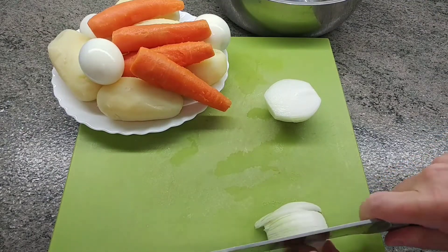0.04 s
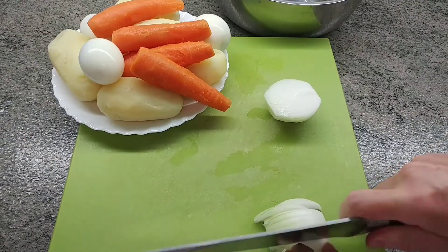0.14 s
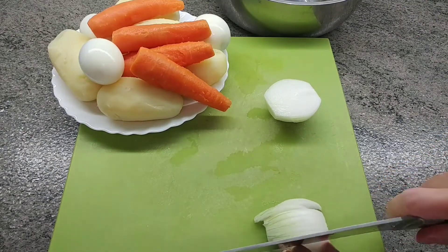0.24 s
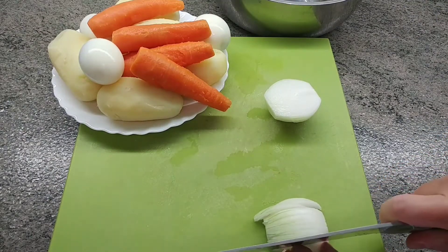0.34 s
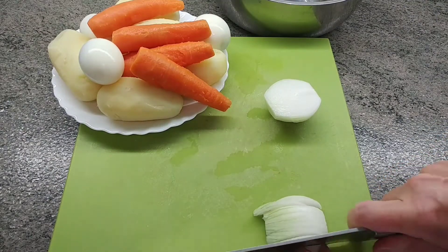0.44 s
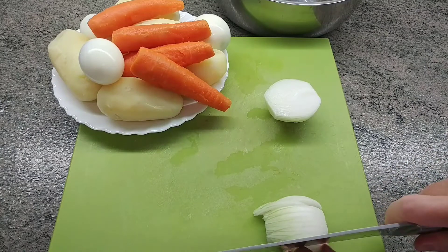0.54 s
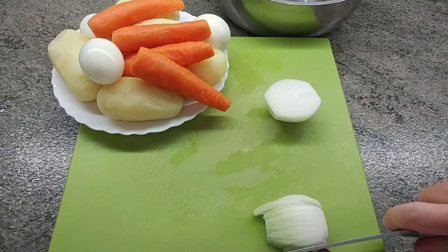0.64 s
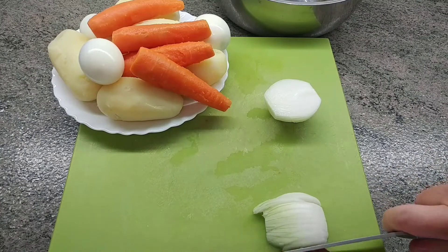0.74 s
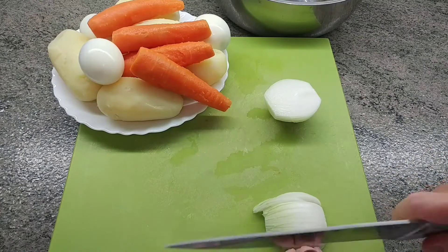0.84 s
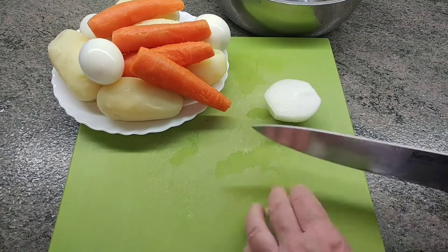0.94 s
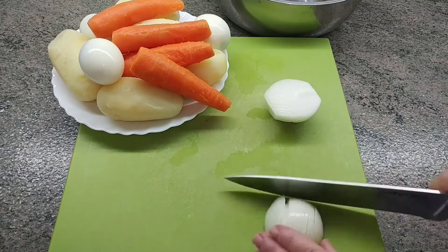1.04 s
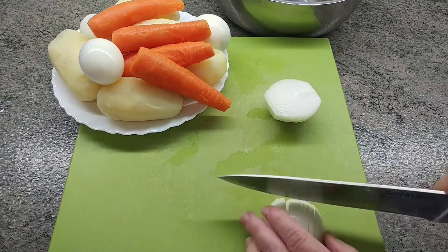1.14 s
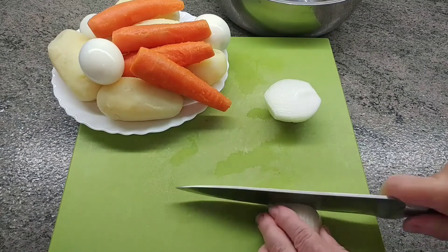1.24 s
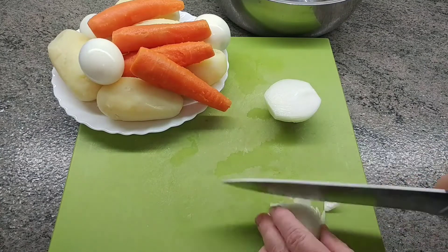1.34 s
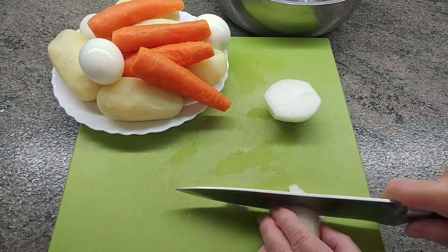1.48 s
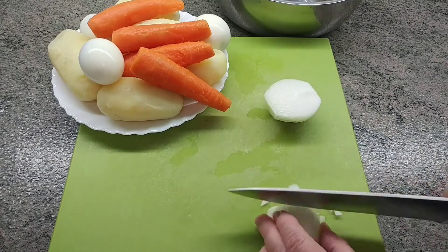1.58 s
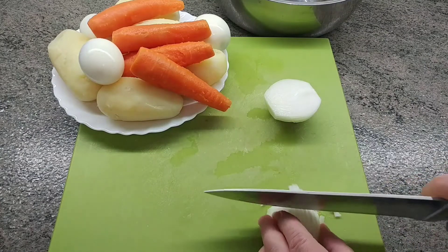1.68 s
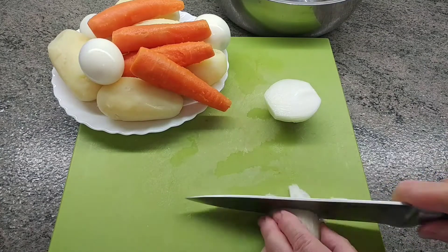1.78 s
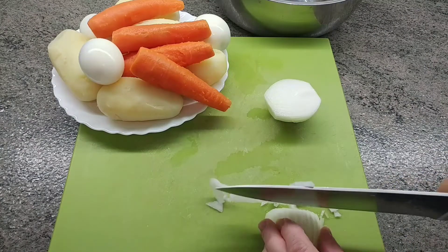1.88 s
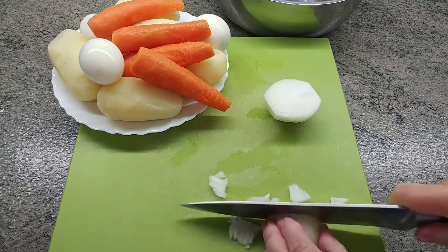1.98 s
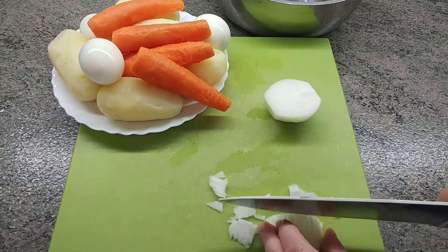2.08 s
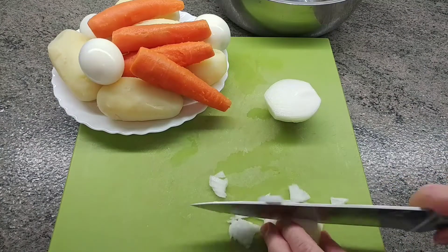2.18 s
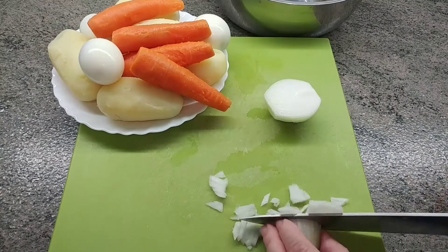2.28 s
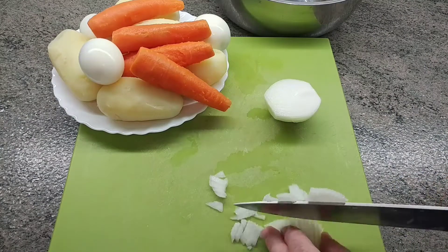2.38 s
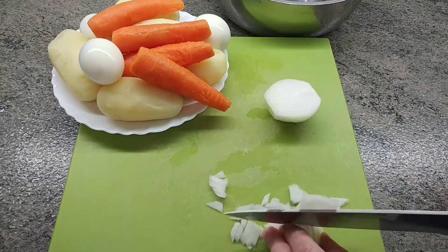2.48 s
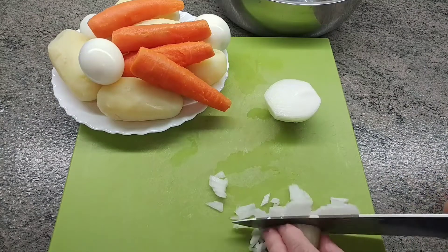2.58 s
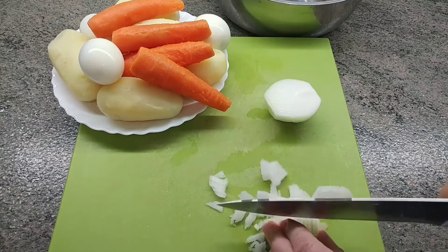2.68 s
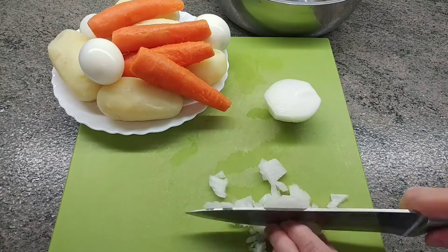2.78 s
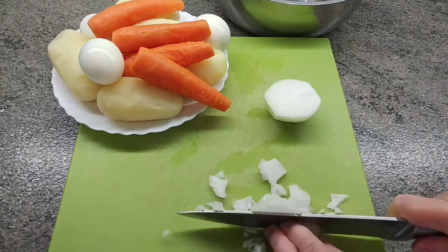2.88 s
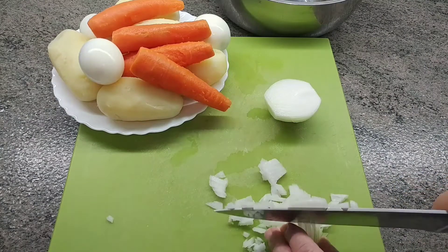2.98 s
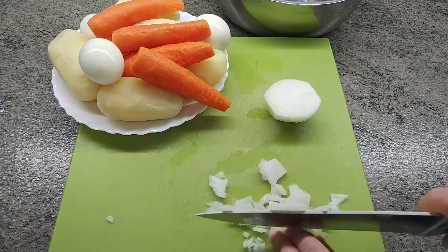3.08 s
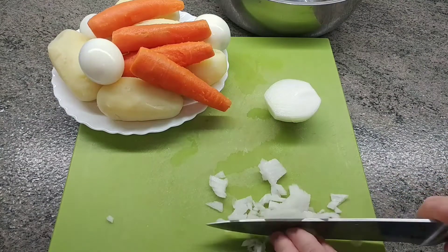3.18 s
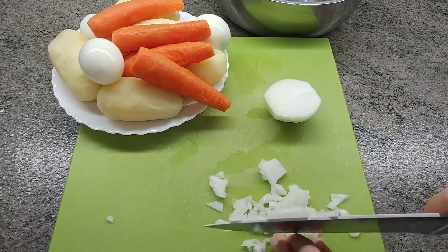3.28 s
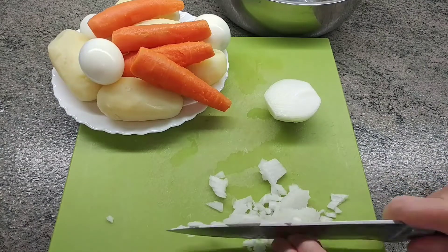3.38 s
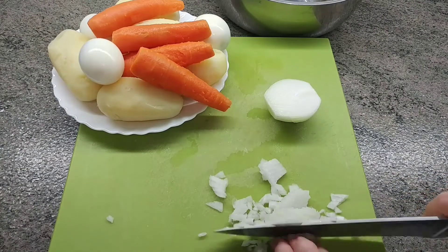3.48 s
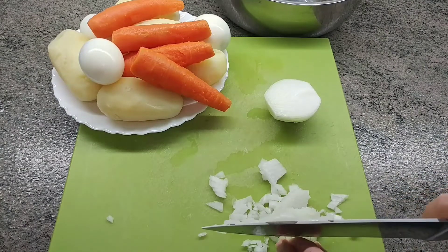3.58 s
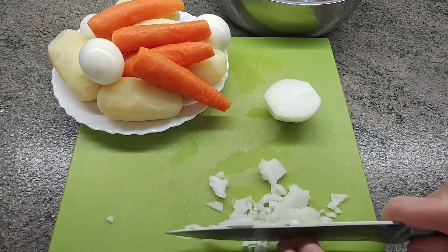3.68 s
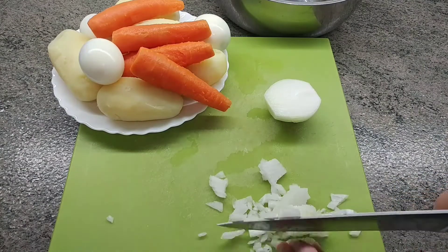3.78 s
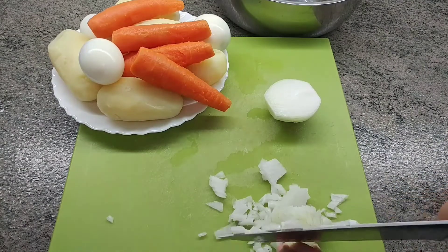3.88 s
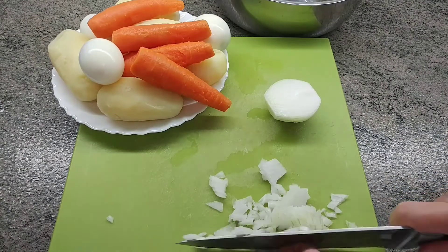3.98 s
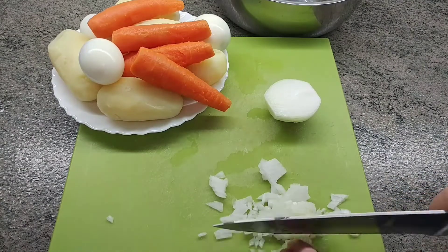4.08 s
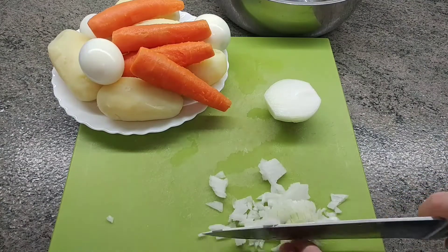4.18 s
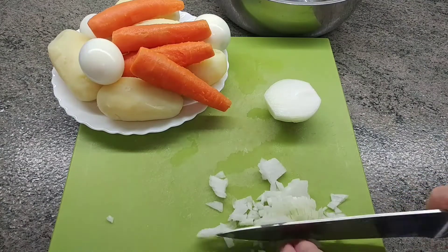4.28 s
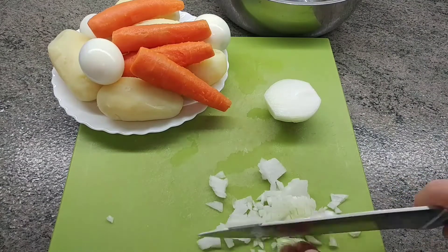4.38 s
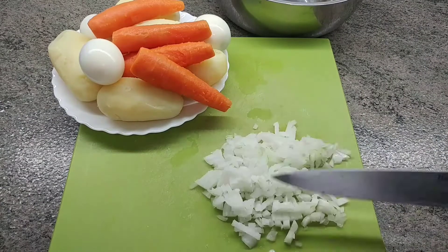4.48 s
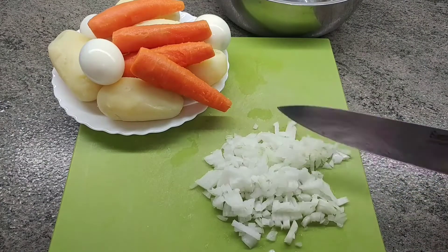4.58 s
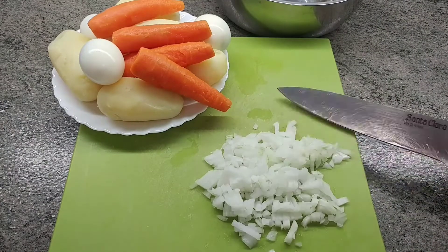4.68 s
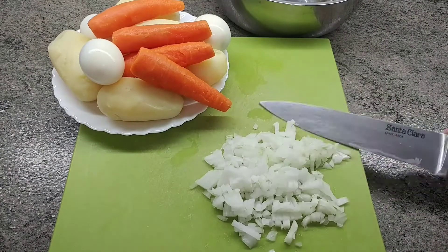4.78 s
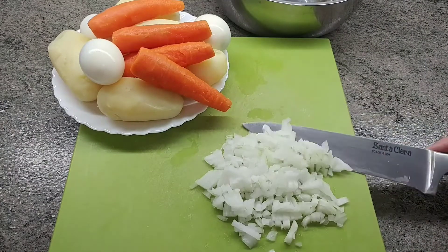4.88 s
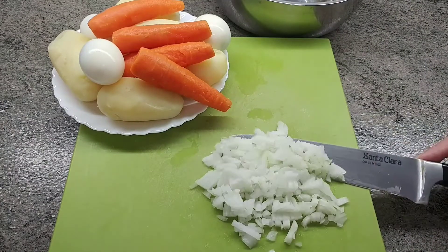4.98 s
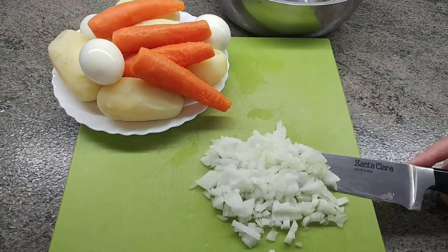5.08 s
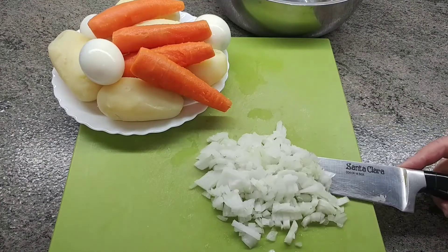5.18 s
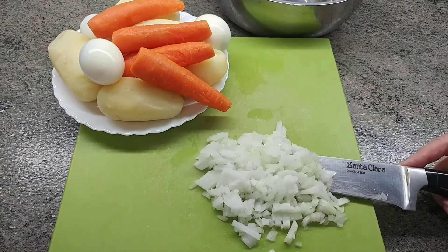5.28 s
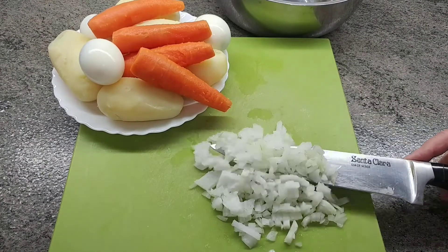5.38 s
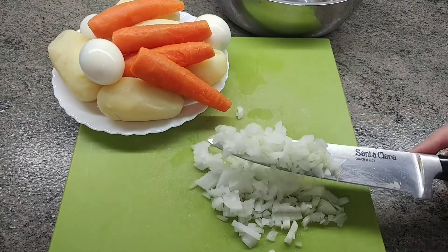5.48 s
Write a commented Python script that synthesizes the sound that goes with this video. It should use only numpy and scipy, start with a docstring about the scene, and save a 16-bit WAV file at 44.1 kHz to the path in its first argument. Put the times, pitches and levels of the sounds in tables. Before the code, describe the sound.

A large knife crunches through an onion with knocking strokes on a plastic board, then a short click and a steady low appliance hum.

```python
"""A chef's knife slices and dices an onion on a plastic board on a kitchen counter, heard from close by.
Each stroke is a crowd of tiny clicks for the crunch, ringing board modes as the edge rolls on,
and low bumps for the counter; small birds chirp outside as gliding tones with echoes.
Towards the end comes a short click with a low thump, and an appliance hums as shaped noise while the knife
is set down and slid under the pieces; the blade sings now and then, and faint room noise lies under it all."""
import sys
import numpy as np
from scipy import signal
from scipy.fft import rfft, irfft
from scipy.io import wavfile

SR = 44100
rng = np.random.default_rng(int(sys.argv[2]) if len(sys.argv) > 2 else 0)


def output_pcm(signal):
    """Save a mono or channel-first signal as 16-bit PCM at the path in sys.argv[1].

    Samples are clipped to [-1, 1] before scaling.
    """
    pcm = np.clip(np.atleast_2d(signal).T, -1, 1) * 32767
    wavfile.write(sys.argv[1], SR, np.round(pcm).astype(np.int16))


N = 244065   # length in samples

# The knife strokes; all levels are relative, and each sound adds its own trim.
# Each row: edge is in at (s), rise before that (s), edge lands at (s), fall by 60 dB after landing (s),
# crunch going in (dB), crunch coming through (dB), juicy fizz near 7 kHz (dB),
# slackening of the rub before the edge is through (dB), rubbing in the board's low modes going in (dB)
# and landing (dB), the same two for its high modes (dB), push on the counter going in (dB) and landing (dB).
STROKES = [(0.0, .03, 0.11, .09, -66, -50.5, 5, -10.5, -49.5, -25.5, -48.5, -50.5, -50, -27),
           (.337, 0.0071, .44, 0.099, -65.5, -54, 4, -4.5, -53, -15.5, -53.5, -10, -56, -17.5),
           (.735, 0.013, 0.8, 0.076, -52.5, -53, 2.5, 8, -41, -23, -47.5, -16, -45, -33.5),
           (.96, .03, 1.078, 0.048, -79, -82, 3.6, -4, -52, -57, -46.5, -68, -66.5, -63.5),
           (1.068, 0.031, 1.089, 0.07, -65, -74, 3.9, 7, -34.5, -38.5, -58, -75, -39, -47),
           (1.274, 0.036, 1.312, 0.14, -54, -45.5, 2.6, 5, -25.5, -35, -41.5, -39, -45.5, -43),
           (1.496, 0.017, 1.58, 0.08, -52.5, -55, 3.6, 1.5, -34.5, -33, -46, -35, -43, -39),
           (1.733, 0.014, 1.826, 0.071, -55.5, -51, 2.6, -4.5, -35.5, -18.5, -40.5, -16, -50, -34),
           (1.992, .04, 2.051, 0.077, -41, -51, 3, 13.5, -28.5, -24, -28, -26, -33, -36.5),
           (2.202, .024, 2.277, .085, -54.5, -48.5, 1.86, 10.5, -28.5, -25, -29.5, -28, -38, -35.5),
           (2.512, 0.042, 2.59, 0.14, -45.5, -54, 4.2, 16, -30, -29.5, -28, -32, -44, -39),
           (2.76, 0.035, 2.794, 0.087, -42.5, -45, 3.2, 9, -23, -39, -29, -40, -35.5, -36),
           (2.849, 0.011, 2.905, 0.082, -57.5, -56, 2.5, -1, -34, -31, -34, -27, -58, -46),
           (2.93, 0.028, 2.99, 0.052, -72, -70, 3, 4, -42.5, -51.5, -42, -70, -60, -46.5),
           (3.137, 0.078, 3.178, 0.13, -46.5, -41, 1, 2, -31, -20.5, -33.5, -24, -42, -38.5),
           (3.364, .025, 3.43, 0.12, -53, -46.5, 2.7, 5, -38, -23, -40.5, -27, -43.5, -38),
           (3.676, 0.09, 3.74, 0.11, -58, -51.5, 2.6, 8.5, -36.5, -36, -38, -41.5, -46.5, -38),
           (3.966, 0.056, 4.029, 0.092, -53.5, -51.5, 2.8, -1.5, -35, -23.5, -34, -25, -45, -36),
           (4.224, 0.079, 4.27, 0.094, -49, -63, 3.9, 25, -42.5, -42, -43.5, -35, -53, -44.5)]


def from_db(db):
    """Turns a level in dB into a gain."""
    return 10 ** (np.asarray(db) / 20)


def rms_one(x):
    """Scales a sound to an rms (average strength) of 1."""
    return x / np.sqrt(np.mean(x ** 2) + 1e-20)


def in_time(rows):
    """Joins timed rows by straight lines: one curve a column, one value a sample."""
    s, *columns = np.transpose(rows)
    return [np.interp(np.arange(N) / SR, s, column) for column in columns]


def at_hz(points):
    """Reads a curve over frequency at every FFT bin, with straight lines on a log-frequency axis."""
    hz = np.maximum(np.arange(N // 2 + 1) * SR / N, 1)
    points = np.array(points)
    return np.interp(np.log(hz), np.log(points[:, 0]), points[:, 1])


def coloured(x, spectrum):
    """Filters a sound by a spectrum in dB and scales it to rms 1."""
    return rms_one(irfft(rfft(x) * from_db(at_hz(spectrum)), N))


def resonate(x, hz, width_hz):
    """Rings like one damped resonance, with a gain of about 1 at its peak."""
    r = np.exp(-np.pi * max(width_hz, 5) / SR)
    feedback = [1, -2 * r * np.cos(2 * np.pi * hz / SR), r * r]
    return signal.lfilter([(1 - r * r) / 2, 0, (r * r - 1) / 2], feedback, x + 1e-18)


def bandpass(x, low_high_hz):
    """Keeps one band of frequencies."""
    return signal.sosfilt(signal.butter(2, low_high_hz, "band", fs=SR, output="sos"), x)


def grains(per_s, spread_db):
    """Makes two draws of random clicks of uneven size, at rms 1."""
    sizes = from_db(spread_db * np.minimum(rng.exponential(1, (2, N)), 5))
    signs = rng.choice([-1, 1], (2, N))
    happens = rng.random((2, N)) < per_s / SR
    return rms_one(sizes * signs * happens)


def flicker(per_s, depth_db):
    """Makes a gain that wanders at random."""
    r = np.exp(-2 * np.pi * per_s / SR)
    wander = signal.lfilter([1], [1, -2 * r, r * r], rng.standard_normal(N))
    return from_db(depth_db * rms_one(wander))


def swell(s, rise_s, t60):
    """Makes an envelope that climbs to 1, then falls by 60 dB in t60 seconds; it ends within half a second."""
    out, i = np.zeros(N), round(s * SR)
    t = np.arange(min(N - i, SR // 2)) / SR
    climb = np.minimum(t / max(rise_s, 1e-4), 1) ** 2
    fall = from_db(-60 * np.maximum(t - rise_s, 0) / max(t60, .003))
    out[i:i + len(t)] = climb * fall
    return out


def cutting():
    """Follows crunch, low rubbing, high rubbing and push as each stroke rises, slackens, lands and dies away."""
    # The knife set down and slid under the pieces. Each row: time in seconds, crunch in dB,
    # low rubbing in dB, high rubbing in dB, push in dB.
    slide = [(4.36, -100, -84, -100, -88), (4.48, -74, -52.5, -78.5, -56), (4.506, -93, -59, -81.5, -72),
             (4.582, -78.5, -47, -89, -66), (4.61, -76.5, -58, -70, -59.5), (4.734, -89.5, -71, -79, -76.5),
             (4.76, -91, -33, -35.5, -34), (4.804, -80, -56.5, -57.5, -57.5),
             (4.926, -73.5, -54.5, -72, -48.5), (5.002, -85, -69, -66, -58), (5.1, -83, -66, -79.5, -63.5),
             (5.138, -65, -58.5, -73.5, -56), (5.172, -84.5, -70, -75, -58), (5.48, -92, -59.5, -76.5, -62),
             (5.53, -94, -51.5, -81, -62)]
    # Quietest levels, between strokes: crunch, low rubbing, high rubbing and push, each in dB.
    rest_db = (-93, -88.5, -92, -80)
    # How much of the slackening reaches low rubbing, high rubbing and push, each as a plain factor.
    sag_shares = (0.63, 1.3, .4)
    roll_s = 0.033   # longest time between the edge coming through the onion and lying on the board
    # the crunch drops while the edge rolls on, then outlasts the board by this factor
    crunch_stop_db, crunch_linger = 6.5, 1.18
    # after this share of its fall time a stroke has lost only this much, then it stops faster
    tail_knee, tail_knee_db = 0.47, 25
    t = np.arange(N) / SR
    levels = np.maximum(in_time(slide), np.array(rest_db, float)[:, None])
    for s, rise, lands, t60, crunch_in, crunch_through, _, sag_db, *contact in STROKES:
        through = max(lands - roll_s, (s + lands) / 2)
        shapes = [(crunch_in, crunch_through, crunch_through - crunch_stop_db, t60 * crunch_linger)]
        for going_in, landing, share in zip(contact[::2], contact[1::2], sag_shares):
            shapes.append((going_in, going_in - share * sag_db, landing, t60))
        span = slice(max(int((s - rise) * SR), 0), int((lands + 2 * t60) * SR))
        for level, rest, (going_in, slack, landing, dying) in zip(levels, rest_db, shapes):
            times = [s - rise, s, through, lands, lands + tail_knee * dying, lands + 2 * dying]
            heights = [rest, going_in, slack, landing, landing - tail_knee_db, landing - 130]
            level[span] = np.maximum(level[span], np.interp(t[span], times, heights))
    return levels


def crunch(crunch_db):
    """Onion cells burst as dense, clumped clicks under the edge, and each band of pitch flickers by itself."""
    # Colour of the bursting cells. Each row: frequency in Hz, relative level in dB.
    cell_colour = [(880, -32), (1500, -9), (1760, 0), (2070, -25.5), (2550, -3.5), (2940, -7.5),
                   (3890, -3.5), (5100, -9), (7100, 2.5), (9030, -8), (10600, -5.5), (15200, -13.5),
                   (16000, -19.5), (16500, -39)]
    # The edge bites through a skin. Each row: start in seconds, relative peak in dB, fall by 60 dB in seconds.
    skin_bites = [(0.079, -16.5, 0.12), (0.334, -51, 0.042), (0.3648, -42, 0.08), (0.411, -21.5, 0.13),
                  (0.6878, -29.5, 0.14), (0.7295, -44.5, 0.09), (0.7663, -21.5, 0.23),
                  (0.9758, -42.5, 0.093), (1.063, -51, 0.069), (1.275, -28.5, 0.072), (1.497, -25.5, 0.081),
                  (1.735, -45.5, 0.08), (1.7669, -14.5, 0.026), (1.8086, -47.5, 0.13),
                  (1.9889, -25.5, 0.073), (2.194, -16, 0.097), (2.409, -58, 0.064), (2.4918, -18, 0.06),
                  (2.5082, -48.5, 0.073), (2.7551, -25.5, 0.058), (2.763, -24, 0.18), (2.8479, -47, 0.08),
                  (3.097, -43.5, 0.057), (3.128, -28.5, 0.11), (3.357, -37, 0.07), (3.403, -24, 0.14),
                  (3.6364, -35.5, 0.059), (3.67, -29, 0.078), (3.708, -12, 0.11), (3.9383, -37, 0.056),
                  (3.9613, -18, 0.13), (4.218, -48.5, 0.058), (4.2247, -15.5, 0.014)]
    dense = grains(9000, spread_db=1.0) * flicker(110, depth_db=2.0)
    snaps = from_db(-9) * grains(160, spread_db=5.0)   # single thick cells snap above the dense crunch
    cells = coloured(dense + snaps, cell_colour)
    edges = np.geomspace(900, 18000, 9)
    coarse = from_db(4.5)   # coarse tearing in the five lowest bands, up to about 5.9 kHz
    fizz = from_db(in_time([(row[0], row[6]) for row in STROKES])[0])
    shares = [coarse] * 5 + [fizz, 1, 1]
    patchy = 0
    for share, band in zip(shares, zip(edges, edges[1:])):
        patchy = patchy + share * flicker(25, depth_db=1.6) * bandpass(cells, band)
    bites = sum(from_db(db - 18) * swell(s, .0015, t60) for s, db, t60 in skin_bites)
    return (from_db(crunch_db + 12.5) + bites) * patchy


def board(rubbing_db, high_rubbing_db):
    """Rubbing, landing chatter and one clean knock a blow drive the same damped plastic modes."""
    # The edge lands on the board. Each row: start in seconds, chatter in dB, low, high and top modes
    # each in dB, roll-on time in seconds, fall of the chatter by 60 dB in seconds, clean knock in dB.
    # All levels are relative.
    blows = [(0.102, -19.5, -9, -12, -18, 0.003, 0.11, -9),
             (0.428, -9.5, -16.5, -14, 0.5, 0.014, 0.11, -19),
             (0.779, -11.5, -10, -4, -0.5, 0.008, 0.11, -24),
             (1.019, -26, -22, -19, -30, 0.001, 0.065, -13.5),
             (1.499, -25.5, -16.5, -17, -1, 0.0027, 0.18, -30.5),
             (1.544, -10.5, -17, -6.5, -11.5, 0.011, 0.078, -20.5),
             (1.802, -18.5, -19.5, -10, 8.5, 0.0037, 0.11, -16),
             (1.991, -19, -31, -19.5, -3, 0.0017, 0.037, -25),
             (2.029, -7, -8.5, -9, -23, 0.0019, 0.067, -14),
             (2.196, -21, -12, -10, 0.5, 0.0088, 0.023, -32.5),
             (2.259, -19.5, -5.5, -3, -38.5, 0.004, 0.1, -28.5),
             (2.499, -24, -5.5, -19, -4.5, 0.013, 0.11, -22.5),
             (2.559, -10.5, -7, -6.5, -32.5, 0.0057, 0.087, -24),
             (2.755, -23, -21, -6.5, -4, 0.0038, 0.071, -22.5),
             (2.876, -16, -10, -1.5, -36, 0.0067, 0.053, -21.5),
             (3.178, -7.5, -27, -2, -13, 0.0026, 0.058, -7),
             (3.408, -22, -9.5, -9, -12, 0.0024, 0.061, -23),
             (3.446, -12.5, -9.5, -1.5, -12.5, 0.013, 0.11, -24),
             (3.739, -25.5, -20, -4, -42.5, 0.002, 0.038, -24.5),
             (4.006, -8.5, -36, -2, -10, 0.0067, 0.055, -22),
             (4.263, -17.5, -9.5, -11.5, -26.5, 0.0064, 0.048, -27),
             (4.755, -45, -4, -8.5, -16.5, 0.0062, 0.045, -27)]
    # Modes of the board. Each row: frequency in Hz, least width in Hz, relative level in dB.
    board_modes = [(265, 110, -14), (358, 58, -11), (302, 30, -1.5), (375.6, 120, -4), (452, 71.3, -0.5),
                   (571.5, 85, -4.5), (677, 123, -2.5), (769.6, 67, 4), (831, 77, -1.5), (975.5, 41, -3.5),
                   (1150, 90.5, 0.5), (1203, 90, 3), (1297, 110, -1), (1479, 110, -6), (1668, 100, -12),
                   (2109, 60, -14), (2313, 46, -17.5), (2454, 45, -15.5), (2540, 85, -16),
                   (2754, 17, -15.5), (3030, 270, -22.5)]
    # four groups of modes: low, middle, high and top
    drive = from_db([rubbing_db + 8.5, rubbing_db + 16.0, high_rubbing_db + 14.5, high_rubbing_db + 11])
    knocks_db = np.zeros((len(blows), 4))
    for i, (s, peak_db, low_db, high_db, top_db, roll_s, t60, knock_db) in enumerate(blows):
        groups_db = np.array([low_db + 7.5, 4, high_db + 11.5, top_db + 15.0])
        drive += from_db(peak_db + groups_db)[:, None] * swell(s, roll_s, t60)
        knocks_db[i] = knock_db + 34 + groups_db
    contact = grains(6000, spread_db=4.0)
    at = [round(row[0] * SR) for row in blows]
    uneven_db = rng.normal(0, 3.5, (len(blows), len(board_modes)))   # where the edge lands favours other modes
    press = np.hanning(26) / 12   # the knock presses for about half a millisecond
    out = 0
    for k, (hz, width, db) in enumerate(board_modes):
        group = int(hz > 440) + int(hz > 900) + int(hz > 1550)
        force = drive[group] * contact * flicker(4.4, depth_db=1.5)
        knock = np.zeros(N)
        knock[at] = from_db(knocks_db[:, group] + uneven_db[:, k])
        force[0] += np.convolve(knock, press)[:N]
        sign = (-1) ** k   # neighbouring modes move in opposite directions
        out = out + sign * from_db(db) * resonate(force, hz, max(width, hz / 40))
    # plastic is soft: the contact lasts too long to carry treble
    return signal.sosfilt(signal.butter(6, 3300.0, fs=SR, output="sos"), out)


def counter(push_db):
    """The counter takes the pushes as a low rumble of noise and single soft bumps of a few cycles."""
    # Soft bumps of hand and board. Each row: start in seconds, relative peak in dB, frequency in Hz.
    bumps = [(0.096, -29, 105), (0.429, -21, 116.2), (0.733, -42, 103), (0.771, -34, 121.8),
             (1.017, -40, 100.2), (1.057, -34.5, 104), (1.278, -32.5, 118.4), (1.288, -33, 113.7),
             (1.399, -66, 111), (1.454, -61, 70.0), (1.497, -39, 109.5), (1.519, -38.5, 118),
             (1.656, -48, 116), (1.77, -31, 96.9), (1.984, -32, 106.6), (2.029, -34, 108),
             (2.142, -50, 94.2), (2.193, -28, 103), (2.247, -31.5, 96), (2.445, -41, 102),
             (2.493, -31, 104), (2.529, -37.5, 115), (2.56, -34.5, 110), (2.702, -41.5, 88.8),
             (2.754, -28.5, 78.1), (2.778, -33.5, 101), (2.865, -41.5, 161.1), (2.959, -39.5, 171.6),
             (3.007, -46, 61.9), (3.057, -53, 76.3), (3.102, -30.5, 100), (3.138, -34, 108),
             (3.177, -30.5, 108), (3.232, -42, 117), (3.324, -56, 75.6), (3.368, -33.5, 96.9),
             (3.411, -32.5, 113), (3.449, -41.5, 176), (3.562, -56, 64.6), (3.634, -50.5, 109),
             (3.654, -44.5, 96), (3.681, -29.5, 99.6), (3.717, -32, 106), (3.796, -52, 116),
             (3.929, -49, 107), (4.007, -43.5, 161), (4.053, -43, 112), (4.222, -43, 112.7),
             (4.264, -49, 124)]
    rumble = from_db(push_db - 4.5) * rms_one(resonate(rng.standard_normal(N), 105, 87))
    bump_s = 0.028
    t = np.arange(int(bump_s * SR)) / SR
    arch = np.sin(np.pi * (t / t[-1]) ** .7)   # rises a little faster than it falls
    for s, peak_db, hz in bumps:
        i = int(s * SR)
        rumble[i:i + len(t)] += from_db(peak_db) * arch * np.sin(2 * np.pi * hz * t)
    return rumble


def room_air():
    """The quiet of the room is steady, faint noise with its own colour."""
    # Colour of the room. Each row: frequency in Hz, relative level in dB.
    air_colour = [(24, -42.5), (40, -13), (102, 0.5), (367, -12), (449, -2), (623, -10.5), (782, -7),
                  (1030, -17), (1230, -24), (1940, -19.5), (7180, -17), (15300, -28), (16500, -53.5)]
    return from_db(-73.5) * coloured(rng.standard_normal((2, N)), air_colour)


def birds(yard_t60=.21, rasp_hz=230, build_s=.01):
    """Raspy chirps glide in pitch, blurred by the echoes of yard and kitchen."""
    # Chirps outside. Each row: start in seconds, length in seconds, name of the note, level before echoes in dB.
    chirps = [(0.133, 0.019, "middle", -67.5), (.205, 0.025, "low", -81.5), (0.236, 0.028, "middle", -75.5),
              (0.257, .011, "low", -71), (0.536, 0.023, "low", -68.5), (0.591, 0.027, "middle", -79),
              (0.95, 0.024, "high rising", -65.5), (0.97, 0.015, "low", -60),
              (1.041, 0.035, "middle", -62.5), (1.08, .03, "high", -74.5), (1.118, 0.044, "rising", -71),
              (1.145, 0.015, "middle", -64), (1.16, 0.015, "high", -71), (1.653, 0.027, "low", -73),
              (1.838, .016, "low", -61.5), (1.906, .038, "middle", -73), (1.93, .03, "high", -75.5),
              (2.392, 0.015, "low", -63.5), (2.596, 0.023, "low", -62), (2.981, 0.027, "low", -72.5),
              (3.542, 0.0105, "low", -81), (4.357, 0.03, "middle", -72.5), (4.373, 0.038, "high", -84),
              (4.508, 0.048, "rising", -65), (4.564, 0.038, "middle", -56), (4.611, 0.017, "high", -65.5),
              (4.616, 0.019, "low", -60), (4.931, .044, "low", -64), (5.26, 0.031, "high rising", -74.5),
              (5.282, 0.045, "low", -62), (5.418, 0.027, "low", -67.5)]
    # Notes of the birds, by name. Each entry: start in Hz, end in Hz.
    notes = {"low": (4560, 3020), "middle": (6030, 5330), "high": (7750, 7100), "rising": (3340, 4850),
             "high rising": (5250, 6320)}
    calls = np.zeros(N)
    rasp = rasp_hz * rms_one(resonate(rng.standard_normal(N), 160, 300))   # the pitch trembles fast
    for s, length, note, db in chirps:
        start_hz, end_hz = notes[note]
        i, n = int(s * SR), int(length * SR)
        glide = start_hz + (end_hz - start_hz) * np.linspace(0, 1, n) ** 0.9
        phase = 2 * np.pi * np.cumsum(glide + rasp[i:i + n]) / SR
        calls[i:i + n] += from_db(db) * np.hanning(n) ** 0.14 * np.sin(phase)
    t = np.arange(SR // 3) / SR
    fading = from_db(-60 * t / yard_t60 - 15) * np.minimum(t / build_s, 1)
    echoes = rng.standard_normal((2, len(t))) * fading
    return signal.fftconvolve(calls[None], echoes, axes=1)[:, :N]


def blade():
    """Friction noise rings the thin steel as it is rubbed or tapped; the grip decides which modes speak."""
    # Modes of the blade. Each row: frequency in Hz, width in Hz, relative level in dB.
    blade_modes = [(2573, 67, 12), (3490, 56, 3.5), (4150, 28, 11.5), (6330, 41, -7.5), (8120, 48, 1),
                   (7020, 30, 0), (10300, 73, 2.5), (11320, 90, -1.5)]
    # The blade sings. Each row: start in seconds, rise in seconds, fall by 60 dB in seconds,
    # relative level in dB, favoured frequency in Hz, spread around it in octaves.
    sings = [(1.04, 0.027, 0.1, -64, 8550, 0.88), (4.75, 0.0013, 0.153, -55, 2800, 0.31),
             (4.79, .07, .4, -63, 7100, .16), (5.11, 0.022, .1, -74, 8430, 0.19)]
    rub, out = rng.standard_normal((2, N)), 0
    for hz, width, mode_db in blade_modes:
        push = 0
        for s, rise, t60, db, favoured_hz, spread in sings:
            off_favour = np.log2(hz / favoured_hz) / spread
            push = push + from_db(db - 2.1 * off_favour ** 2) * swell(s, rise, t60)
        out = out + from_db(mode_db + 25) * resonate(rub * push, hz, width)
    return out


def hum():
    """A motor drones: shaped noise plus casing resonances, each wavering on its own."""
    # Loudness of the appliance. Each row: time in seconds, relative level in dB.
    hum_level = [(4.3, -69), (4.426, -59), (4.49, -54), (4.56, -47.5), (4.622, -53.5), (4.724, -51),
                 (5.206, -54), (5.422, -51), (5.53, -52.5)]
    # Colour of the broad part. Each row: frequency in Hz, relative level in dB.
    hum_colour = [(24, -74.5), (40, -39.5), (92, -38), (117, -28), (146, 2.5), (200, -11.5), (293, -2.5),
                  (373, -17), (467, -4), (605, -3.5), (745, -29.5), (798, -26), (1170, -49), (1710, -59.5),
                  (2500, -44), (3250, -77.5), (5500, -120)]
    # Resonances of the casing. Each row: frequency in Hz, width in Hz, relative level in dB.
    casing = [(148, 20, -19.5), (475.3, 37, 3.5), (532, 15, 1.5), (602, 76, -3)]
    level_db, = in_time(hum_level)
    on = np.clip((np.arange(N) / SR - hum_level[0][0]) / 0.14, 0, 1) ** 2   # fades in over 0.14 s
    broad = coloured(rng.standard_normal((2, N)), hum_colour) * flicker(25, depth_db=1.5)
    shake, narrow = rng.standard_normal((2, N)), 0
    for hz, width, db in casing:
        ring = rms_one(resonate(resonate(shake, hz, width), hz, width))
        narrow = narrow + from_db(db) * flicker(7, depth_db=3.2) * ring
    return on * from_db(level_db) * (from_db(-2.5) * broad + from_db(-2.0) * narrow)


def click_and_thump():
    """A short click rings briefly at 560 Hz over a low thump."""
    click_s, ring_hz, thump_hz = 4.46215, 560, 50
    t = np.arange(N) / SR - click_s
    click = -from_db(-13.5) * swell(click_s, .0002, .009) * np.sin(2 * np.pi * ring_hz * t)
    thump = swell(click_s + .001, .002, .042) * np.cos(2 * np.pi * thump_hz * (t - .0055))
    return click + from_db(-21) * thump


def two_ports(pair):
    """The first draw reaches both microphone ports with a lead and a tilt, the second one in opposition."""
    # Likeness of left and right. Each row: frequency in Hz, likeness from 0 to 1.
    likeness = [(60, 0.31), (130, 1), (290, 0.53), (640, 0.43), (1410, 0.021), (3100, 0.37), (6820, 0.38),
                (15000, 0.061)]
    # Balance of the ports. Each row: frequency in Hz, left minus right in dB.
    balance_db = [(60, -11.5), (99, -2.5), (160, -2), (270, 0), (450, -2), (740, 3.5), (1220, -1),
                  (2010, 0.5), (3330, 0), (5500, -8), (9080, 3.5), (15000, 4)]
    # Lead of the left port. Each row: frequency in Hz, lead in radians.
    lead = [(0, 0), (520, -0.76), (860, -1.1), (1550, 2.5), (1980, -0.95), (3270, 5), (4130, -1.46),
            (5430, -7.5), (6980, 2.3), (8010, 1.0), (13400, 1.9), (16200, 1)]
    alike = np.clip(at_hz(likeness), 0, 1)
    shared, own = rfft(pair)
    sides = np.array([[1], [-1]])   # left, right
    turn = np.exp(.5j * sides * at_hz(lead))
    tilt = from_db(sides * at_hz(balance_db) / 2)
    mixed = np.sqrt((1 + alike) / 2) * shared + sides * np.sqrt((1 - alike) / 2) * own
    return irfft(turn * tilt * mixed, N)


def scene():
    """Adds everything at the two ports; counter, click and thump reach both almost alike."""
    crunch_db, rubbing_db, high_rubbing_db, push_db = cutting()
    near = crunch(crunch_db) + board(rubbing_db, high_rubbing_db) + room_air() + blade() + hum()
    bumping = counter(push_db) * from_db([[.5], [-.5]])   # left is 1 dB louder
    return two_ports(near) + bumping + birds() + click_and_thump()


def record(dry):
    """The microphone loses the deep bass, and the top is cut."""
    thin = signal.sosfilt(signal.butter(2, 42.0, "high", fs=SR, output="sos"), dry)
    cutoff_hz = 16600
    return signal.sosfilt(signal.cheby2(12, 70, cutoff_hz, fs=SR, output="sos"), thin)


dry = scene()
out = record(dry)
output_pcm(out)
```